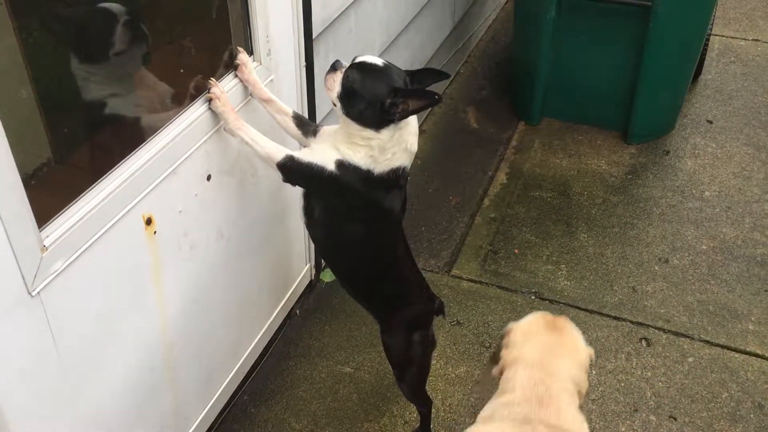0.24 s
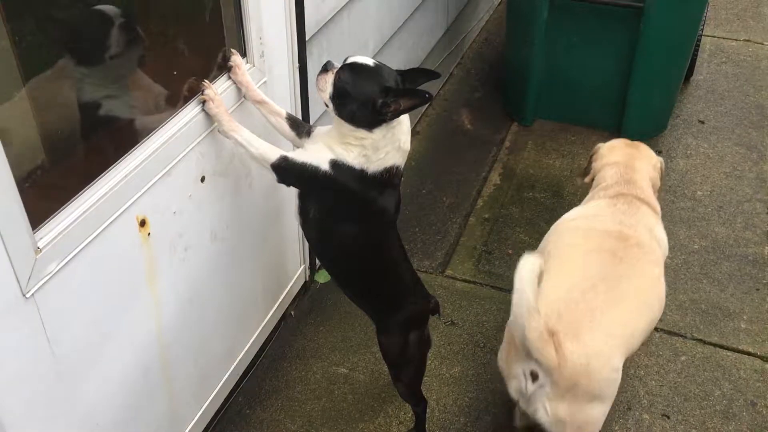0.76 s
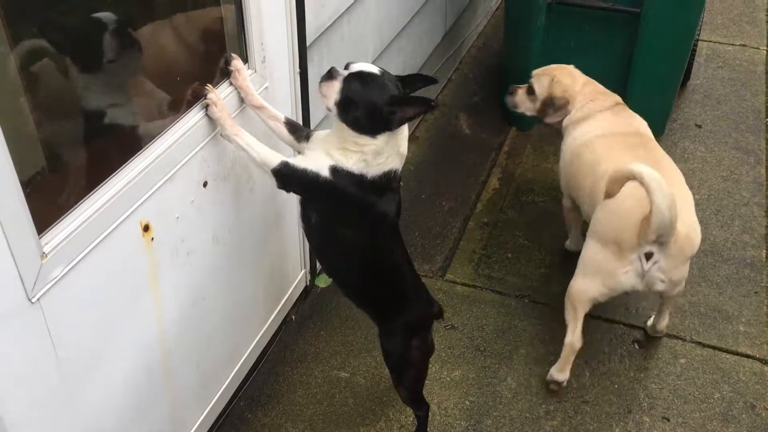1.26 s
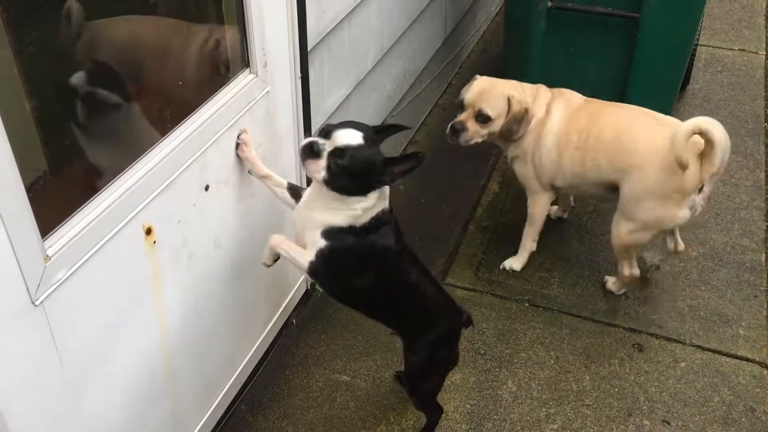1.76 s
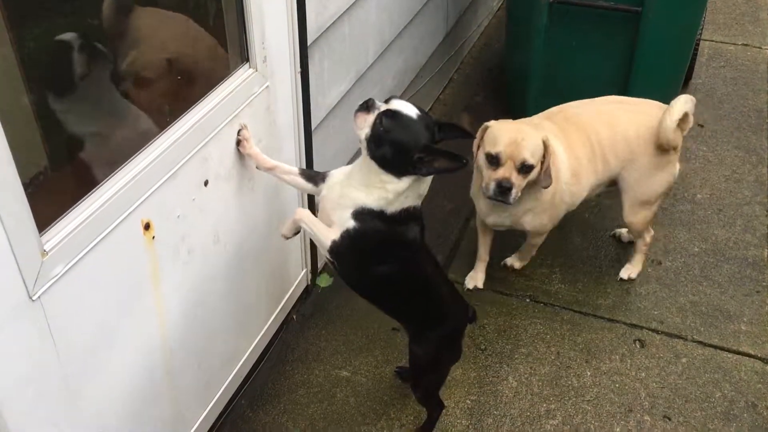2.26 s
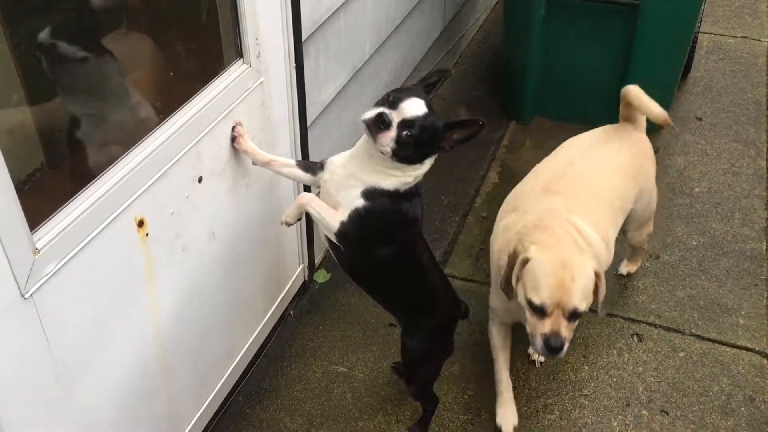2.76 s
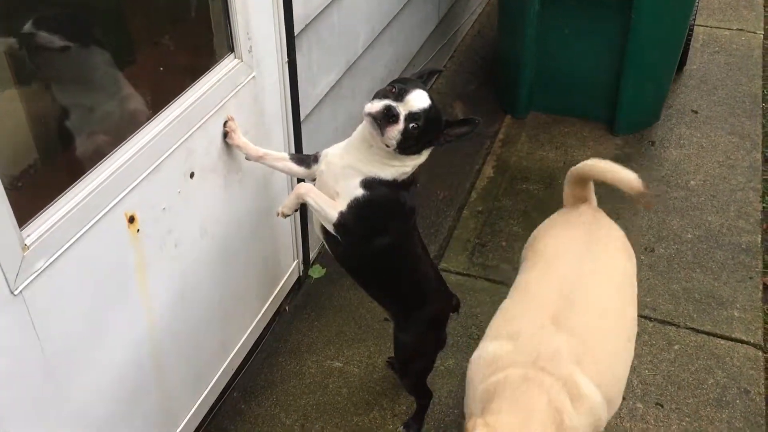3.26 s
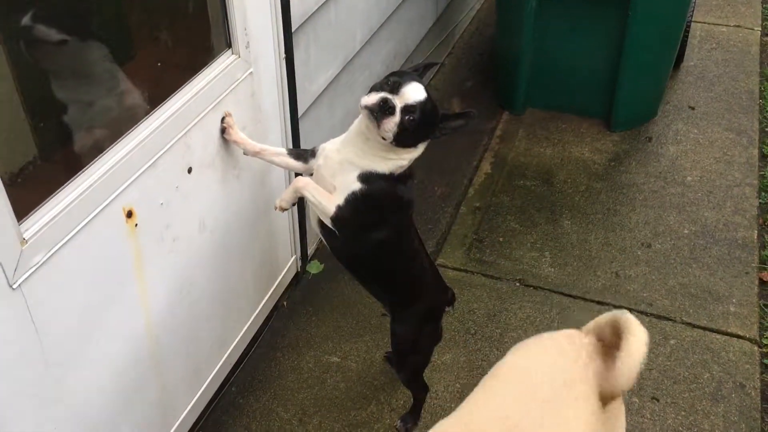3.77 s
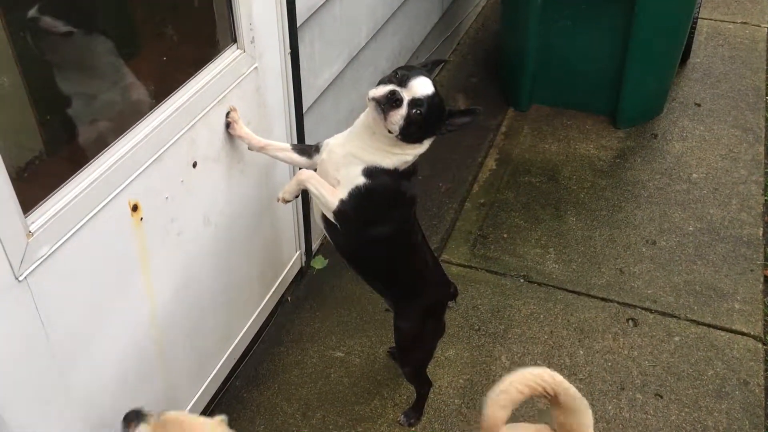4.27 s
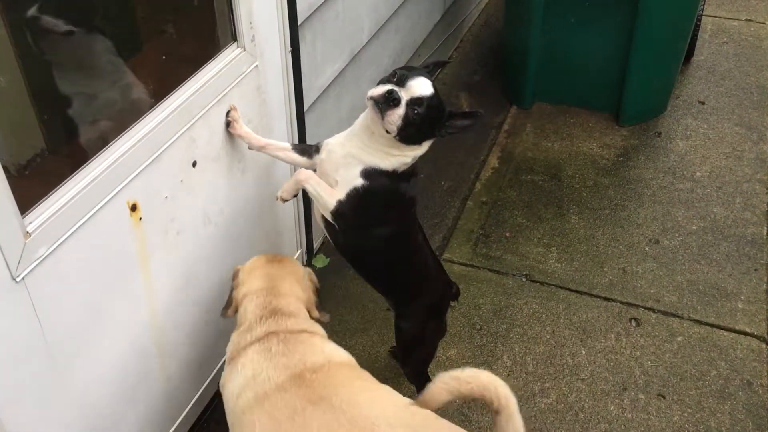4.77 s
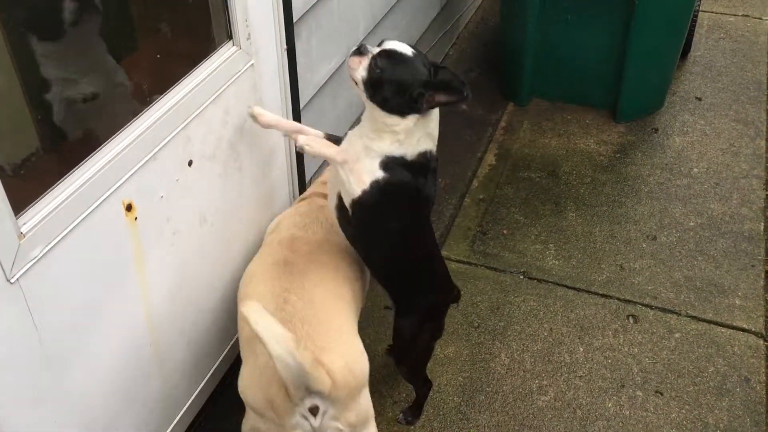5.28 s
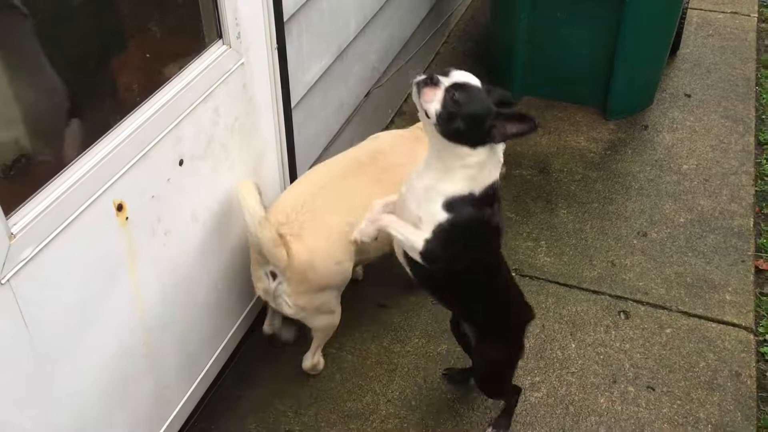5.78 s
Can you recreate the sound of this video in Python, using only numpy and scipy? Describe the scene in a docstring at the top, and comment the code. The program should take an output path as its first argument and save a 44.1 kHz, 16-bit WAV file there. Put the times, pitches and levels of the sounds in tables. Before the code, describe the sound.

Dog claws tick and scrape sharply on a door panel close by while a songbird repeats quick falling whistles over a faint distant engine hum.

```python
"""At a storm door among houses: a small dog stands against the panel, its claws ticking and dragging close by.
A second dog walks round on concrete. One of them whistles thinly through its nose and snuffs.
A songbird repeats a falling whistle that echoes between the houses, over a distant engine's rumble and hum.
Claws are impulses and slip noise ringing in filters, birds and nose are gliding tones, and the distance
is shaped noise, slow sines and diffuse echo tails."""
import sys
import numpy as np
from scipy import signal
from scipy.fft import rfft, irfft, next_fast_len
from scipy.io import wavfile
from scipy.ndimage import map_coordinates

SR = 44100
rng = np.random.default_rng(int(sys.argv[2]) if len(sys.argv) > 2 else 0)


def transcribe(signal):
    """Save signal, clipped to [-1, 1], as a 16-bit WAV file at the path in sys.argv[1]."""
    frames = np.atleast_2d(signal).T
    limited = np.clip(frames, -1, 1)
    pcm = np.round(limited * 32767).astype(np.int16)
    wavfile.write(sys.argv[1], SR, pcm)


N = 265923

# Colour of claws on grit. Each row: frequency in Hz, level in dB.
GRIT_COLOUR = [(500, -9), (2200, -11.5), (3500, 1), (4900, -5), (6300, -1.5), (8800, -4.5), (11000, -13),
               (16000, -16.5)]
# Echo close around the door. Each row: frequency in Hz, time to die by 60 dB in seconds.
PORCH_DECAY = [(300, 0.14), (3500, 0.17), (8000, 0.17), (15000, 0.16)]
# Echo of the street beyond. Each row: frequency in Hz, time to die by 60 dB in seconds.
STREET_DECAY = [(1500, 0.23), (3000, 0.47), (4100, 1), (4700, 0.75), (9000, 0.17)]


def amp(db):
    """Decibels to gain."""
    return 10 ** (np.asarray(db) / 20)


def unit(x):
    """Scale to rms 1."""
    return x / np.sqrt(np.mean(x ** 2) + 1e-20)


def along(points, hz):
    """Read (Hz, value) points at the frequencies hz, on a log axis."""
    f, v = np.transpose(points)
    return np.interp(np.log(hz + 1), np.log(f + 1), v)


def curves(rows, t):
    """Each column after the time, read at the times t."""
    s, *cols = np.transpose(rows)
    return [np.interp(t, s, c) for c in cols]


def wobble(rate, size=N):
    """A smooth random curve through normal knots, rate knots a second."""
    knots = rng.standard_normal(int(size * rate / SR) + 4)
    return map_coordinates(knots, [np.arange(size) * rate / SR])


def add(track, s, sound):
    """Mix a sound in at time s, cut off at the track's end."""
    start = max(round(s * SR), 0)
    part = track[start:start + len(sound)]
    part += sound[:len(part)]


def coloured(x, gain_db):
    """x through the causal minimum-phase filter whose gain is the function gain_db(Hz)."""
    size = 2 * next_fast_len(len(x))
    gain = amp(gain_db(np.fft.rfftfreq(size, 1 / SR)))
    cepstrum = irfft(np.log(gain + 1e-6))
    # folding the cepstrum forward makes the filter causal
    cepstrum[1:size // 2] *= 2
    cepstrum[size // 2 + 1:] = 0
    return irfft(rfft(x, size) * np.exp(rfft(cepstrum)))[:len(x)]


def tilted(spectrum, slope_db, pivot_hz):
    """A spectrum leaned about a pivot by some dB per octave, the lean held constant below 700 Hz."""
    return lambda hz: along(spectrum, hz) + slope_db * np.log2(np.clip(hz, 700, SR) / pivot_hz)


def noise(spectrum):
    """Noise of rms 1 with the given spectrum."""
    return unit(coloured(rng.standard_normal(N), lambda hz: along(spectrum, hz)))


def reverberation(x, decay, size):
    """A fresh diffuse tail made from size samples of noise, each frequency dying at its own speed."""
    hz, t, z = signal.stft(rng.standard_normal(size), SR, nperseg=256)
    dying = z * amp(-60 * t / along(decay, hz)[:, None])
    tail = signal.istft(dying, SR, nperseg=256)[1]
    return signal.fftconvolve(x, tail / np.linalg.norm(tail))


def whistle(length, start_hz, end_hz, glide_s, attack, fade_db, waver, waver_rate, flutter_db, overtone_db):
    """An unsteady, fluttering tone with weak overtones that leaves one pitch and settles towards another."""
    glide_ease = 1.35  # above 1 a glide leaves its first pitch gently
    release_s = 0.0017  # every whistle stops quickly
    t = np.arange(0, length, 1 / SR)
    hz = end_hz + (start_hz - end_hz) * np.exp(-(t / glide_s) ** glide_ease)
    phase = 2 * np.pi * np.cumsum(hz * (1 + waver * wobble(waver_rate, len(t)))) / SR
    envelope = np.minimum(1, np.minimum(t / attack, (length - t) / release_s))
    envelope *= amp(fade_db * t / length + flutter_db * wobble(386, len(t)))
    # second and third harmonics, left out where they would alias
    overtones = sum((k * hz < SR / 2) * np.sin(k * phase) / k for k in range(2, 4))
    return np.sqrt(2) * envelope * (np.sin(phase) + amp(overtone_db) * overtones)


def background():
    """A distant engine: wavering hum and machine tones as sines, rumble and outdoor hush as shaped noise."""
    # Heave of the rumble. Each row: time in seconds, level in dB before a common trim.
    rumble_level = [(0, -53), (.95, -50), (1.7, -49.5), (2.3, -52.5), (2.8, -49), (3.1, -53.5),
                    (3.6, -50.5), (6.03, -51)]
    # Colour of the rumble. Each row: frequency in Hz, level in dB.
    rumble_colour = [(12, -49), (20, -30), (49, 3), (84, 1.5), (109, -4.5), (122, -3), (141, -9),
                     (167, -8.5), (206, -13), (238, -16), (365, -21), (405, -47), (450, -47.5), (580, -47),
                     (990, -120)]
    # Outdoor hush. Each row: time in seconds, level in dB.
    hush_level = [(0, -61.5), (.7, -64), (3.4, -63), (4.7, -63.5), (6, -63.5)]
    # Colour of the hush. Each row: frequency in Hz, level in dB.
    hush_colour = [(180, -16), (300, -1.5), (425, -7.5), (667, -8), (801, -9), (1040, -6.5), (1750, -15),
                   (4090, -21), (4520, -21.5), (5340, -23.5), (5700, -24), (14700, -34.5), (16000, -38)]
    # The engine's hum. Each row: time in seconds, pitch in Hz, level in dB before a common trim.
    engine_hum = [(0, 110, -53), (3, 110.9, -54.5), (6, 113.1, -49.5)]
    # Low machine tones. Each row: pitch in Hz, level in dB midway through.
    machine_tones = [(59, -58.5), (167, -61.5), (206, -63.5)]
    recede_db_per_s = .5  # the machine tones slowly recede
    surge_db, surges_per_s = 1.36, 11  # the rumble heaves unevenly
    t = np.arange(N) / SR
    rumble_db, = curves(rumble_level, t)
    hush_db, = curves(hush_level, t)
    hum_hz, hum_db = curves(engine_hum, t)
    hum_phase = 2 * np.pi * np.cumsum(hum_hz) / SR + 0.5 * wobble(13)
    hum = amp(hum_db + 1.9 + 2.74 * wobble(14)) * np.sin(hum_phase)
    drone = np.zeros(N)
    for hz, db in machine_tones:
        level = amp(db - recede_db_per_s * (t - t.mean()) + 2.2 * wobble(3.22))
        drone += level * np.sin(2 * np.pi * hz * t + 1.08 * wobble(6))
    rumble = amp(rumble_db + 1.0 + surge_db * wobble(surges_per_s)) * noise(rumble_colour)
    hush = amp(hush_db + .9 * wobble(11)) * noise(hush_colour)
    return hum + drone + rumble + hush


def far_birds():
    """Faint quick twitter from many gardens away: a darting tone that reaches the microphone only as echo."""
    # Each row: time in seconds, level of the twitter in dB.
    twitter_level = [(0, -83), (.3, -73), (.6, -80), (4.5, -70), (6, -79)]
    level_db, = curves(twitter_level, np.arange(N) / SR)
    # one extra second lets the echo build up first
    pitch = 2750 * np.exp(.3 * np.sin(1.5 * wobble(90, N + SR)))
    loudness = 1 + np.tanh(wobble(6.6, N + SR))
    twitter = loudness * np.sin(2 * np.pi * np.cumsum(pitch) / SR)
    echo = reverberation(twitter, STREET_DECAY, size=32768)[SR:SR + N]
    return amp(level_db) * unit(echo)


def paws():
    """Faint ticks of grit under the walking paws: sparse random impulses through the grit's colour."""
    grains = (rng.random(N) < 22 / SR) * rng.standard_normal(N)  # about 22 a second
    ticks = coloured(grains, lambda hz: along(GRIT_COLOUR, hz))
    echo = reverberation(ticks, PORCH_DECAY, size=8192)[:N]
    return amp(-78.0) * unit(ticks + 1.4 * echo)


def farther_bird():
    """A farther bird's plain notes: level-pitched whistles with a little street echo."""
    # Each row: start in seconds, length in seconds, pitch in Hz, level in dB.
    pipes = [(0, .115, 4100, -70), (.25, 0.074, 3290, -73), (0.839, 0.055, 3980, -69.5),
             (3.193, 0.051, 1780, -61), (5.123, 0.031, 2940, -65), (5.21, 0.1, 3970, -71),
             (5.771, 0.095, 4010, -72)]
    out = np.zeros(N)
    for s, length, hz, db in pipes:
        note = amp(db) * whistle(length, hz, hz, 1, attack=0.0072, fade_db=-8.5,
                                 waver=0.0087, waver_rate=190, flutter_db=4.0, overtone_db=-31)
        add(out, s, note)
        add(out, s, amp(-12) * reverberation(note, STREET_DECAY, size=32768))
    return out


def drags():
    """A dragged claw presses in and lets go, catching and slipping at random under a swelling stroke."""
    # Each row: start in seconds, level in dB before a common trim, brightness in dB per octave.
    claw_drags = [(0.13, -52, -3), (0.157, -54, -2), (0.657, -45.5, -1), (.68, -45.5, 4.5),
                  (.912, -53, -0.5), (.947, -50, 4), (1.262, -49, 0), (1.288, -44.5, -1),
                  (1.688, -38.5, -1.5), (3.013, -48.5, 2), (3.183, -48.5, 1), (3.551, -39, 11.5),
                  (4.883, -47, 0.5), (4.9, -45.5, -2), (5.311, -40.5, -2.5), (5.339, -42.5, 2),
                  (5.589, -50, 5), (5.763, -48.5, 10.5)]
    stroke_s, slips_per_s = 0.0059, 2100  # time scale of the stroke; average rate of slips
    out, t = np.zeros(N), np.arange(SR // 8) / SR
    for s, db, slope_db in claw_drags:
        slips = (rng.random(len(t)) < slips_per_s / SR) * rng.standard_normal(len(t))
        travel = t / stroke_s
        stroke = travel ** 2 * np.exp(-travel ** 1.4)
        scrape = coloured(slips * stroke, tilted(GRIT_COLOUR, slope_db, pivot_hz=7000))
        # give every scrape the energy of its stroke
        scrape *= amp(db - 9.0) * np.linalg.norm(stroke / stroke.max()) / np.linalg.norm(scrape)
        add(out, s, scrape)
        add(out, s + 0.0043, amp(-2.0) * reverberation(scrape, PORCH_DECAY, size=8192))
    return out


def taps():
    """The claws of a paw land a millisecond or two apart, crack, and ring the door skin's decaying modes."""
    # Sharp contacts. Each row: start in seconds, level in dB before a common trim, panel ring in dB
    # before a common trim, brightness in dB per octave, strength of each toe over the last.
    claw_taps = [(.4105, -48.5, -2, 3, 0.69), (.449, -48.5, -10, 2, .8), (0.9502, -46, -11, 1, 0.66),
                 (1.5616, -43, -6, 3, .3), (1.609, -44.5, 0, 6, 0.37), (1.69, -30.5, 3.5, 0, 0.63),
                 (1.838, -38, -5, -5, 0.46), (1.842, -35.5, -4, -0.5, 0.64), (1.967, -33, -11, 6.5, 0.88),
                 (1.9704, -41, -17, 3, .2), (2.601, -38.5, -10, -5, 1), (2.78, -41.5, -10, 12, .8),
                 (2.999, -42.5, -7, -2, 0.63), (3.175, -43.5, -4, 5, .7), (3.447, -40, 0, 4, 0.77),
                 (3.558, -39, -12, -3, 1), (3.6672, -41.5, -1, -3, 0.81), (3.7842, -45, -10, 3, 0.76),
                 (4.4369, -35, -1, 0, .8), (4.7897, -34.5, -12, 3.5, 0.33), (5.302, -47.5, 0, 1, 0.42),
                 (5.347, -39, -3, 2, 0.78), (5.411, -39, -3, 4, 0.48), (5.556, -44, -5, 16, .8),
                 (5.616, -44, -2, -5, .6), (5.627, -45, -8, 5, .8), (5.7722, -43, -2, 13, 0.81),
                 (5.861, -48, -10, 12, 0.92), (5.969, -47, -10, 1, 0.45)]
    # Colour of the crack. Each row: frequency in Hz, level in dB.
    claw_colour = [(400, -10), (1800, -23), (3500, -5), (6000, 3.5), (8300, 2.5), (10500, -6), (13500, -8),
                   (16000, -19)]
    # Modes of the door skin. Each row: mean pitch in Hz, mean level in dB, time to die by 60 dB in seconds.
    panel_modes = [(2860, -27, 0.024), (3324, 10, 0.037), (3922, 12, 0.03), (4400, 10, 0.022),
                   (5700, 5.5, 0.065)]
    out, t = np.zeros(N), np.arange(SR // 8) / SR
    for s, db, ring_db, slope_db, toe_share in claw_taps:
        contact = 0.069 * rng.standard_normal(len(t)) * amp(-60 * t / 0.04)  # fine chatter of the tips
        contact[0] = 1
        toe_delays = np.cumsum(rng.uniform(0.00091, 0.0022, size=3))  # seconds after the first toe
        for toe, delay in enumerate(toe_delays, 1):
            add(contact, delay, np.array([min(toe_share, 1) ** toe * rng.choice([-1, 1])]))
        crack = coloured(contact, tilted(claw_colour, slope_db, pivot_hz=7000))
        ring = np.zeros(len(t))
        for hz, level, t60 in panel_modes:
            decay = amp(level + rng.normal(0, 1.0) - 60 * t / t60)
            ring += decay * np.sin(2 * np.pi * hz * rng.normal(1, 0.018) * t)
        crack /= np.linalg.norm(crack)
        ring /= np.linalg.norm(ring)
        tap = amp(db + 11.5) * (crack + amp(ring_db - 3.0) * ring)
        add(out, s, tap)
        add(out, s + 0.0037, amp(-5.0) * reverberation(tap, PORCH_DECAY, size=8192))
    return out


def thumps():
    """Soft, very low thuds, perhaps the door flexing under the dog's weight: briefly swelling sines."""
    # Each row: start in seconds, level in dB.
    thuds = [(.915, -41), (1.35, -43), (1.681, -38), (1.966, -44), (2.725, -38.5), (2.81, -40),
             (4.975, -38)]
    mean_hz, swell_s = 64.6, 0.008  # their average pitch and the time they take to swell
    out, t = np.zeros(N), np.arange(SR // 4) / SR
    swell = t / swell_s * np.exp(1 - t / swell_s)
    for s, db in thuds:
        add(out, s, amp(db) * swell * np.sin(2 * np.pi * mean_hz * rng.normal(1, 0.082) * t))
    return out


def house_walls():
    """The bird sits still, so walls repeat every syllable in one pattern, each path scattered by leaves."""
    # Paths to the microphone. Each row: delay in seconds, level in dB before a trim.
    paths = [(0, 4), (.01, 4), (.019, -1.5), (.028, 2), (.04, -2), (.055, -5.5), (.097, -11)]
    # Scatter by leaves. Each row: frequency in Hz, time to die by 60 dB in seconds.
    foliage_decay = [(2300, .014), (4500, .11)]
    walls, click = np.zeros(SR // 4), np.ones(1)
    for delay, path_db in paths:
        add(walls, delay, amp(path_db - 7) * click)
        add(walls, delay, amp(path_db - 3) * reverberation(click, foliage_decay, size=2048))
    return walls


def songbird():
    """Evenly paced syllables, a soft rise and a steep falling slur, echoed by walls and smeared by the street."""
    # The song starts softly, swells and eases off. Each row: time in seconds, rising note in dB,
    # falling note in dB, wall paths in dB; all before trims.
    song_level = [(1.3, -57, -60, -8), (1.66, -60, -56, -3), (1.84, -55.5, -53.5, -5),
                  (2.03, -56, -52, 0.5), (3.7, -51.5, -49.5, 1), (4.2, -55.5, -51.5, 2.5),
                  (4.39, -57.5, -51.5, -1.5)]
    # The two notes of a syllable. Each row: offset from the beat in seconds, length in seconds,
    # start and end pitch in Hz before the song's sag, level in dB before a trim,
    # mean glide time in seconds, attack in seconds, fade in dB.
    syllable_notes = [(-.066, 0.037, 1453, 2313, -6.5, .016, 0.0061, -2),
                      (-.012, 0.06, 5756, 2484, -2, .0175, 0.011, -5.5)]
    # Colour of the bird's voice. Each row: frequency in Hz, level in dB.
    throat = [(1650, 1), (2200, -0.5), (2700, -3), (4200, 2), (4950, -9), (5500, 2.5), (6200, -0.5),
              (8000, -11.5), (9500, -8), (11200, -0.5), (12500, -10)]
    start_s, syllable_s, syllable_count = 1.3028, .1812, 18
    sag_per_s, middle_s = 0.0174, 3  # share of its pitch lost each second, about the song's middle
    glide_scatter = 0.0405  # no two syllables glide quite alike
    out, walls = np.zeros(N), house_walls()
    for beat in start_s + syllable_s * np.arange(syllable_count):
        *levels_db, direct_db = curves(song_level, beat)
        pitch = 1 - sag_per_s * (beat - middle_s) + rng.normal(0, 0.0037)
        for song_db, row in zip(levels_db, syllable_notes):
            offset, length, start_hz, end_hz, db, glide_s, attack, fade_db = row
            glide = glide_s * np.exp(glide_scatter * rng.normal())
            s = beat + offset
            tone = whistle(length, pitch * start_hz, pitch * end_hz, glide, attack, fade_db,
                           waver=0.018, waver_rate=700, flutter_db=2, overtone_db=-11)
            note = coloured(amp(song_db + db - 5.0) * tone, lambda hz: along(throat, hz))
            add(out, s, amp(direct_db) * signal.fftconvolve(note, walls))
            add(out, s + 0.0089, amp(direct_db + 3.5) * reverberation(note, PORCH_DECAY, size=8192))
            add(out, s + .03, amp(0.53) * reverberation(note, STREET_DECAY, size=32768))
    return out


def nasal_whistles():
    """Airy whistles through a dog's narrow nostrils: a gliding tone with noise rushing around its pitch."""
    # Each row: start in seconds, length in seconds, start Hz, end Hz, level in dB before a common trim.
    whines = [(1.325, 0.049, 11800, 10700, -62), (1.366, 0.022, 9650, 8870, -51),
              (1.372, 0.0074, 5000, 6240, -49), (1.379, .024, 4300, 4460, -57.5),
              (1.416, .022, 3250, 3100, -54), (1.443, 0.0276, 4180, 3400, -61),
              (1.473, .014, 5440, 5540, -56.5), (1.488, .012, 2490, 2250, -53),
              (3.264, 0.0167, 5750, 6200, -54.5), (4.721, 0.019, 6080, 6060, -54.5),
              (4.745, 0.0154, 3800, 5200, -55), (4.758, 0.03, 5100, 4280, -58),
              (4.791, 0.024, 3260, 3270, -51), (4.813, 0.011, 2990, 3340, -49),
              (4.822, 0.018, 3750, 4090, -55), (4.841, 0.016, 3720, 2720, -56)]
    # Air over the pure tone; high whistles are airier. Each row: pitch in Hz, level in dB.
    rushing_air = [(3000, -14), (10000, 12)]
    air_fall_db = 40  # per octave away from the pitch
    out = np.zeros(N)
    for s, length, start_hz, end_hz, db in whines:
        tone = whistle(length, start_hz, end_hz, length / 2, attack=0.0018, fade_db=-0.5,
                       waver=0.017, waver_rate=684, flutter_db=3.0, overtone_db=-13)
        centre = (start_hz + end_hz) / 2
        air = unit(coloured(rng.standard_normal(len(tone)),
                            lambda hz: -air_fall_db * abs(np.log2((hz + 1) / centre))))
        air *= np.sqrt(np.hanning(len(tone)))
        airiness = amp(along(rushing_air, centre))
        add(out, s, amp(db - 4.5) * (tone + airiness * air) / np.hypot(1, airiness))
    return out


def snuffs():
    """Wet snuffs and licks: swells of noisy air and tiny pops, hollowed by the muzzle's cavity."""
    # Each row: middle in seconds, width in seconds, level in dB before a common trim, cavity in Hz,
    # wet hiss over the hollow sound in dB.
    muzzle_snuffs = [(1.457, 0.027, -59.5, 590, 1), (1.483, 0.014, -60.5, 1090, 7.5),
                     (1.495, 0.005, -53.5, 2680, 3), (1.508, 0.008, -51.5, 1890, -3),
                     (1.563, 0.0017, -49.5, 1300, -6), (3.8, 0.016, -58.5, 1550, -23),
                     (3.818, 0.025, -58, 910, -21), (3.885, 0.044, -62, 1160, -25),
                     (3.938, .012, -58.5, 605, -25), (5.462, 0.0084, -58, 770, -3.5),
                     (5.647, 0.0044, -61, 1450, -15), (5.677, .004, -66, 1580, -17)]
    # Air through wet nostrils. Each row: frequency in Hz, level in dB.
    nostril_hiss = [(400, 1), (2000, -12), (5500, -9), (11500, -10.5), (16000, -20)]
    spits_per_s, spit_db = 800, -3  # tiny wet pops, and their level over the smooth air
    out, t = np.zeros(N), np.arange(N) / SR
    for s, width, db, cavity_hz, hiss_db in muzzle_snuffs:
        near = t[abs(t - s) < .15]
        swell = np.exp(-((near - s) / width) ** 2 / 2)
        pops = rng.random(len(near)) < spits_per_s / SR
        spits = unit(pops * rng.uniform(-0.96, 1, len(near)))
        flow = rng.standard_normal((2, len(near))) + amp(spit_db) * spits
        hollow = unit(coloured(flow[0], lambda hz: -12 * abs(np.log2((hz + 1) / cavity_hz)) ** 1.32))
        hiss = unit(coloured(flow[1], lambda hz: along(nostril_hiss, hz)))
        level = amp(db - 3.0 + 1.74 * wobble(169.7, len(near)))
        add(out, near[0], level * swell * (hollow + amp(hiss_db) * hiss))
    return out


def nose():
    """A dog's nasal whistles and snuffs, with echo from the porch and, fainter, the street."""
    direct = nasal_whistles() + snuffs()
    porch = amp(-3.5) * reverberation(direct, PORCH_DECAY, size=8192)[:N]
    street = amp(-11) * reverberation(direct, STREET_DECAY, size=32768)[:N]
    return direct + porch + street


def scene():
    """Dogs close by, birds and engine beyond, on one channel."""
    distance = background() + far_birds() + farther_bird() + songbird()
    close = paws() + drags() + taps() + thumps() + nose()
    return (distance + close)[None]


def record(dry):
    """The microphone keeps nothing above its band limit."""
    top_hz = 15950
    size = next_fast_len(N + SR // 2)
    kept = np.fft.rfftfreq(size, 1 / SR) < top_hz
    return irfft(rfft(dry, size) * kept, size)[:, :N]


dry = scene()
out = record(dry)
transcribe(out)
```